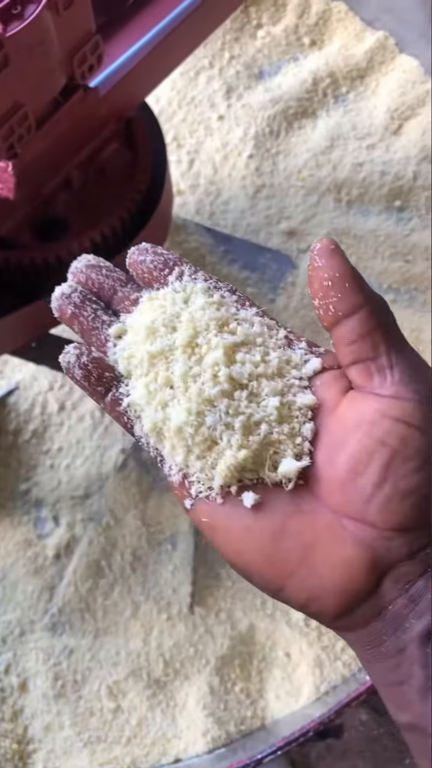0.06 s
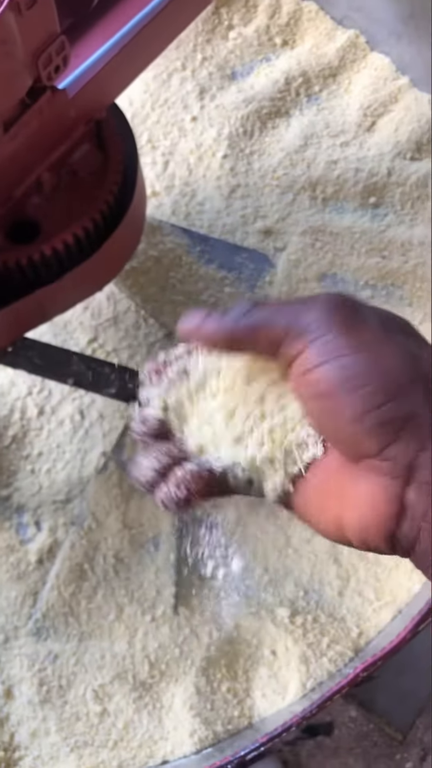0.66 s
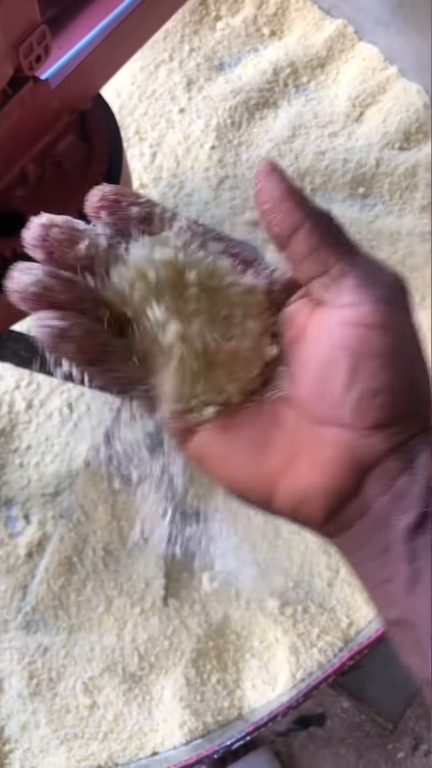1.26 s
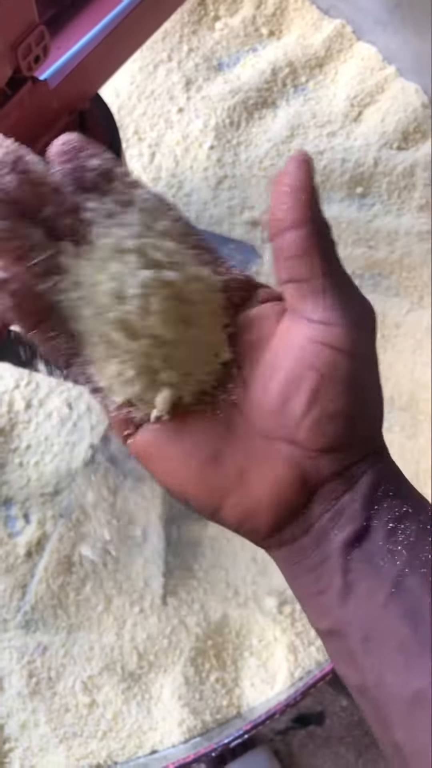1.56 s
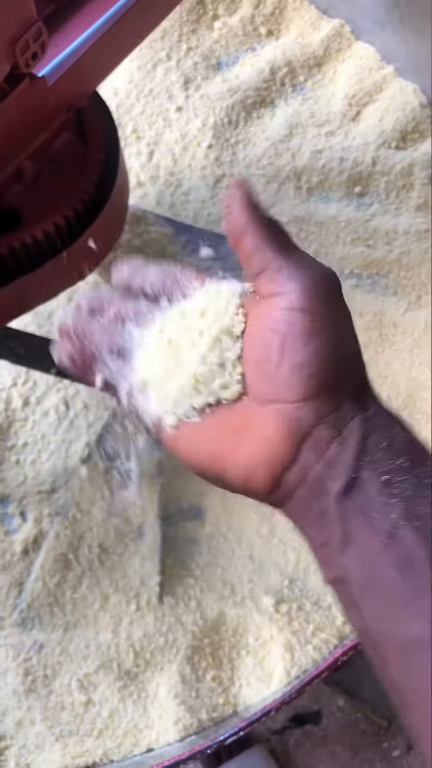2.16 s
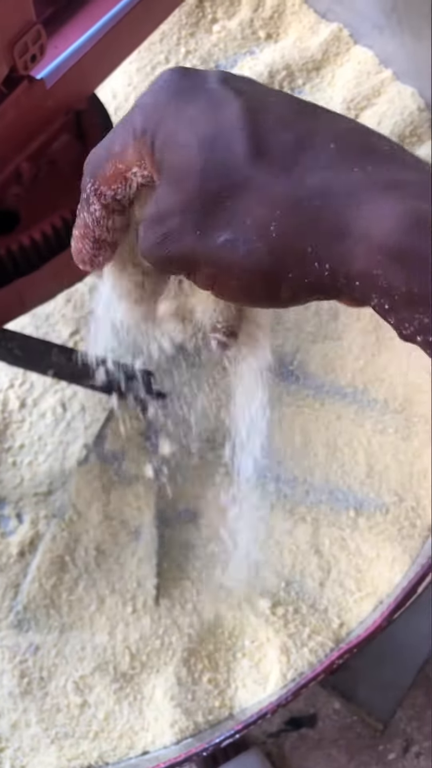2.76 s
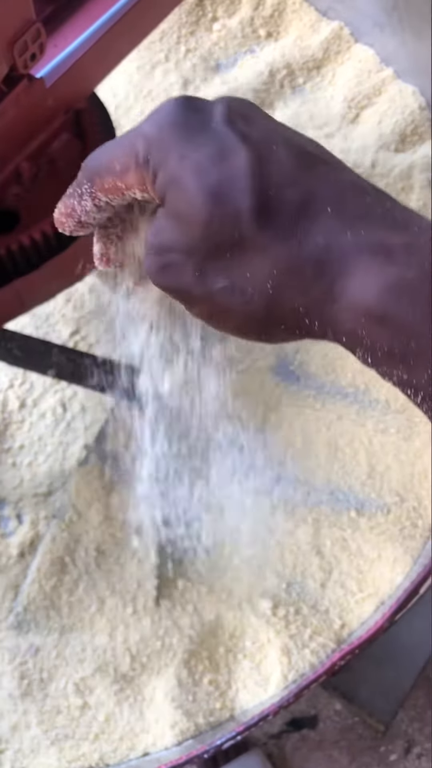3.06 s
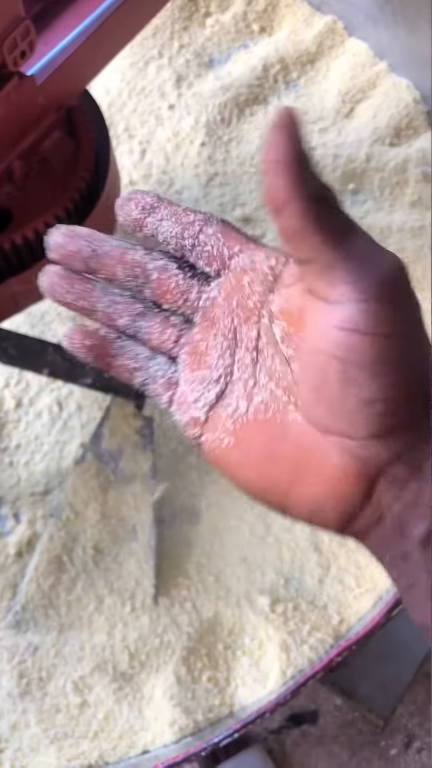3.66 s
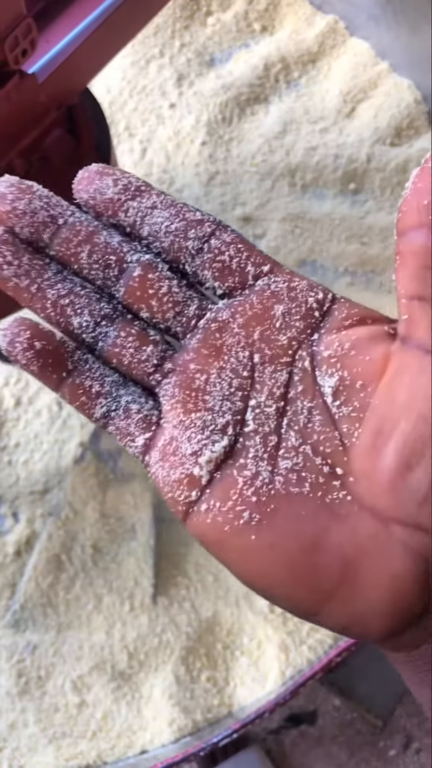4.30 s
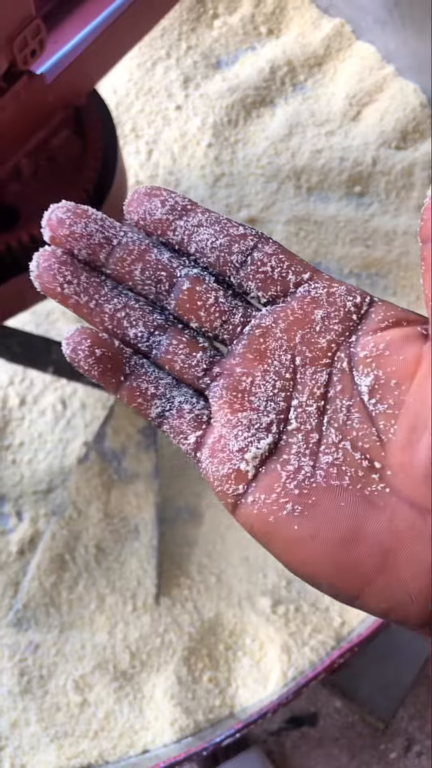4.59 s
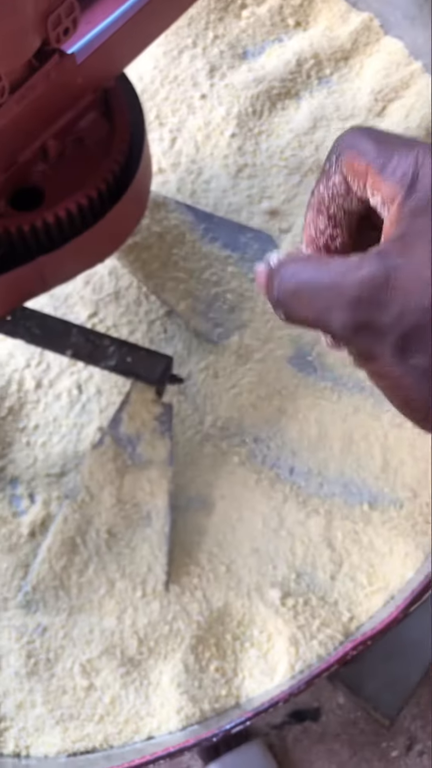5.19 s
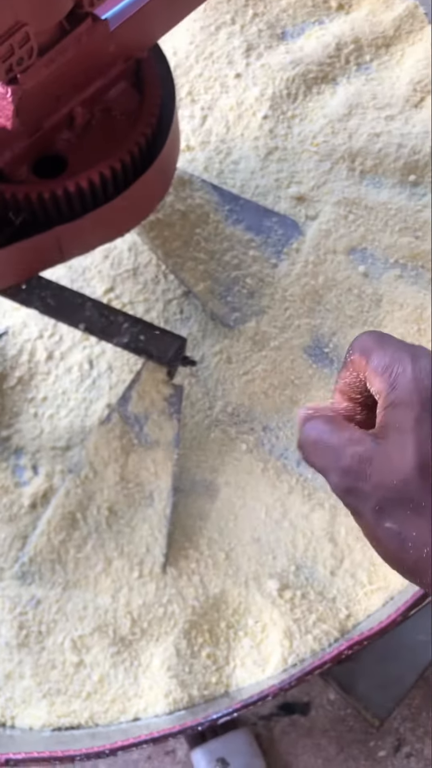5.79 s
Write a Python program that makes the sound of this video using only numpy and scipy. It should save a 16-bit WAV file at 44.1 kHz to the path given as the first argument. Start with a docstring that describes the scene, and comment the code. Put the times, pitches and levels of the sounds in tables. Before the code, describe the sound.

A geared motor hums loudly and steadily with a light rattle, over a softly hissing gas burner and faintly falling grains.

```python
"""Garri frying machine

Close by, a geared motor hums and its gears rattle, nearly alike every shaft turn.
A gas burner hisses under the wide pan, which drones as the paddles push through the meal.
A hand sifts a sample of dry grains back into the pan, with a few faint ticks near the end."""
import sys
import numpy as np
from scipy import signal
from scipy.fft import rfft, irfft, next_fast_len
from scipy.io import wavfile

SR = 44100
rng = np.random.default_rng(int(sys.argv[2]) if len(sys.argv) > 2 else 0)


def unload_audio(sound):
    """Save the sound as a 16-bit wav file, at the path given as the first command line argument."""
    columns = np.transpose(np.atleast_2d(sound))
    # keep every value between -1 and 1, then stretch to whole-number steps
    steps = np.round(np.clip(columns, -1, 1) * 32767)
    wavfile.write(sys.argv[1], SR, steps.astype(np.int16))


N = 257544
TIME = np.arange(N) / SR
HAND_EMPTY_S, EMPTY_FADE_S = 3.35, 1.2  # a fade time is how long a sound takes to fall 60 dB


def gain_of(db):
    """Turns decibels into a factor to multiply by."""
    return 10 ** (np.asarray(db) / 20)


def unit_level(x):
    """Scales a signal to an average level (rms) of 1."""
    return x / np.sqrt(np.mean(x ** 2) + 1e-20)


def coloured(x, points):
    """Shapes white noise of level 1 to a curve with columns pitch_hz, level_db_per_hz."""
    size = next_fast_len(N + 4096)
    hz, db = np.transpose(points)
    level_db = np.interp(np.log(np.fft.rfftfreq(size, 1 / SR) + 1), np.log(hz), db)
    return irfft(rfft(x, size) * gain_of(level_db), size)[:N] * np.sqrt(SR / 2)


def wander(rate_hz, count=16):
    """A smooth random drift of level 1, swinging up to rate_hz times a second."""
    speeds = np.geomspace(rate_hz / 6, rate_hz, count)[:, None]
    drift = np.sin(2 * np.pi * (speeds * TIME[::64] + rng.random((count, 1)))).sum(0)
    return np.interp(TIME, TIME[::64], unit_level(drift))


def noise_band(pitch_hz, width_hz):
    """Noise of level 1 that rings around one pitch."""
    size = next_fast_len(N)
    shape = 1 / (1 + ((np.fft.rfftfreq(size, 1 / SR) - pitch_hz) / width_hz * 2) ** 2)
    return unit_level(irfft(rfft(rng.standard_normal(size)) * shape, size)[:N])


def fade_after(end_s, fade_s):
    """Holds at 1 until end_s, then falls 60 dB every fade_s."""
    return gain_of(-60 * np.maximum(TIME - end_s, 0) / fade_s)


def burner(flicker_db=1.06, waver_db=1.0):
    """A flickering flame and the thin whistles of its gas jet."""
    # roar and hiss of the flame: pitch_hz, level_db_per_hz
    flame_curve = [(25, -95), (55, -77.5), (150, -73.5), (190, -78.5), (320, -80), (520, -80.5),
                   (760, -88.5), (1400, -89), (2400, -92.5), (3100, -99), (4400, -102), (7700, -112.5),
                   (9400, -112.5), (14500, -124.5)]
    # ringing and whistles of the gas jet: pitch_hz, width_hz, level_db
    whistles = [(3450, 500, -72.5), (4370, 620, -74), (6670, 480, -84.5), (8700, 98, -88.5),
                (12740, 130, -94.5)]
    flame = coloured(rng.standard_normal(N) * gain_of(flicker_db * wander(25)), flame_curve)
    jet = sum(gain_of(db + waver_db * wander(3)) * noise_band(hz, width) for hz, width, db in whistles)
    return flame + jet


def ticks():
    """Short, bright, dry snaps."""
    # the snaps: start_s, peak_db, fade_s
    snaps = [(5.354, -57.5, .042), (5.364, -67, .035)]
    brightness = [(1500, -15), (5000, 1), (9500, -8), (11800, -1), (15500, -8)]  # pitch_hz, relative_db
    strength = np.zeros(N)
    for start_s, peak_db, fade_s in snaps:
        rise = np.clip((TIME - start_s) / .001 + 1, 0, 1)
        strength += gain_of(peak_db) * rise * fade_after(start_s, fade_s)
    return strength * unit_level(coloured(rng.standard_normal(N), brightness))


def pour(start_s=0.71, rise_s=0.44, level_db=-77):
    """A soft hiss of grains landing on the meal, from when the fingers open until the hand is empty."""
    stream = np.clip((TIME - start_s) / rise_s, 0, 1) * fade_after(HAND_EMPTY_S, EMPTY_FADE_S)
    return gain_of(level_db) * stream * noise_band(pitch_hz=5700, width_hz=2400)


def grain_flow(trickle_db=-88.5, rise_s=.03, fade_s=.13):
    """How strongly grains fall: a thin trickle between the fingers, plus a spill at each stroke."""
    # the fingers work the grains: start_s, length_s, level_db
    strokes = [(.4, .15, -82.5), (.65, .06, -78.5), (.75, 0.097, -76), (1.29, .52, -76), (2.085, .115, -76),
               (2.28, .12, -80), (5.765, .045, -78)]
    trickle = gain_of(trickle_db) * fade_after(HAND_EMPTY_S, EMPTY_FADE_S)
    power = trickle ** 2  # separate noises add up as squares
    for start_s, length_s, level_db in strokes:
        rise = np.clip((TIME - start_s) / rise_s, 0, 1)
        power += (gain_of(level_db) * rise * fade_after(start_s + length_s, fade_s)) ** 2
    return np.sqrt(power)


def grains(hits_per_s=9000, spread_db=2, clump_db=1):
    """Thousands of tiny dry hits, falling in loose clumps, make a bright fizz."""
    sizes = gain_of(spread_db * np.minimum(rng.exponential(1, N), 4)) * rng.choice([-1, 1], N)
    hits = sizes * (rng.random(N) < hits_per_s / SR) * gain_of(clump_db * wander(35))
    # tone of the fizz: pitch_hz, relative_db
    brightness = [(2000, -27.5), (5000, -6.5), (9700, 1.5), (11400, 10.0),
                  (12700, 0), (13400, -1.5), (15500, -4)]
    return unit_level(coloured(hits, brightness)) * grain_flow()


def pan():
    """The paddles rub the pan so it drones on two low notes; each harder rub is one smooth swell."""
    # the pan's notes under a light rub: pitch_hz, width_hz, level_db
    notes = [(316.6, 35, -68), (506, 50, -63.5)]
    # a paddle presses harder: middle_s, length_s, low_note_rise_db, high_note_rise_db
    rubs = [(.2, 0.96, 10.5, 2), (1.12, 0.46, 8, 8.5), (2.0, 0.58, 10.5, 4), (2.952, .6, 8, 6),
            (5.05, 0.53, 12, 3.5), (5.473, 0.95, 13, 0)]
    drone = np.zeros(N)
    for note, (pitch_hz, width_hz, level_db) in enumerate(notes):
        swell_db = np.zeros(N)
        for middle_s, length_s, *rise_db in rubs:
            swell = np.cos(np.pi * np.clip((TIME - middle_s) / length_s, -.5, .5)) ** 2
            swell_db += rise_db[note] * swell
        drone += gain_of(level_db + swell_db) * noise_band(pitch_hz, width_hz)
    return drone


def chafing(turns, squeak_every_s=.77, first_squeak_s=.06, squeak_db=-86, scuff_db=-74):
    """A slow gear squeaks thinly each time it goes round; the fast shaft scuffs once a turn."""
    swell = np.cos(np.pi * (TIME - first_squeak_s) / squeak_every_s) ** 2
    squeak = gain_of(squeak_db) * swell * noise_band(pitch_hz=9820, width_hz=170)
    contact = np.exp(-(turns % 1) / 0.11)
    scuff = gain_of(scuff_db) * contact * noise_band(pitch_hz=6900, width_hz=700)
    return squeak + scuff


def rattle(turns, fade_s=.12, uneven_db=2, force_spread=0.12, teeth=48):
    """Each tooth knocks with its own force at its own place in the turn, and the housing rings."""
    place_in_turn = (np.arange(teeth) + rng.random(teeth)) / teeth
    tooth_force = gain_of(uneven_db * rng.standard_normal(teeth)) * rng.choice([-1, 1], teeth)
    # the machine is already running, so knocks from a short lead-in still ring
    lead = SR // 4
    all_turns = np.concatenate([np.arange(-lead, 0) * (turns[1] - turns[0]), turns])
    laps = np.arange(-3, int(turns[-1]) + 2)[:, None]
    knock_at = np.interp(laps + place_in_turn, all_turns, np.arange(N + lead)).ravel()
    forces = (tooth_force * (1 + force_spread * rng.standard_normal((len(laps), teeth)))).ravel()
    in_range = (knock_at > 0) & (knock_at < N + lead - 1)
    knocks = np.bincount(np.round(knock_at).astype(int), forces * in_range, N + lead)
    ring_spectrum = rfft(gain_of(-60 * TIME[:lead] / fade_s) * rng.standard_normal(lead))
    ring = irfft(ring_spectrum / abs(ring_spectrum))  # no single pitch stands out
    return unit_level(signal.oaconvolve(knocks, ring)[lead:lead + N])


def gears(turns, patterns=7):
    """As the paddle arm goes round, other teeth meet and one rattle melts into the next."""
    # ring of the gear housing: pitch_hz, level_db_per_hz
    housing_curve = [(170, -110), (250, -84.5), (500, -88), (760, -86.5), (950, -84), (1480, -83.5),
                     (1720, -88.5), (2250, -89), (2650, -91), (3000, -101), (4400, -104), (6600, -114),
                     (9000, -126), (15000, -150)]
    position = TIME / TIME[-1] * (patterns - 1)
    shares = [np.cos(np.pi / 2 * np.clip(position - k, -1, 1)) for k in range(patterns)]
    return coloured(sum(share * rattle(turns) for share in shares), housing_curve)


def motor_hum(turns, strong_waver_db=-0.01, weak_waver_db=1):
    """Clean tones locked to the shaft: two strong ones hold firm, the weak ones waver."""
    # tones of the motor and gears: cycles_per_turn, level_db
    tones = [(4, -68.5), (8, -30), (9, -54.5), (10, -55), (11, -61), (12, -33.5), (14, -59), (15, -58),
             (16, -53.5), (20, -60.5), (28, -65.5), (32, -71.5), (40, -64.5), (44, -66.5), (47, -73.5),
             (48, -63), (52, -61), (56, -66), (57, -64.5), (70, -68.5), (103, -72.5), (106, -68.5),
             (114, -74), (122, -76.5), (133, -71.5), (145, -68.5), (165, -69), (223, -74.5)]
    hum = np.zeros(N)
    for cycles_per_turn, level_db in tones:
        strong = cycles_per_turn in (8, 12)
        waver_db, phase = (strong_waver_db, 1 / 2) if strong else (weak_waver_db, rng.random())
        waver = unit_level(gain_of(waver_db * wander(1.965)))
        tone = np.sqrt(2) * np.sin(2 * np.pi * (cycles_per_turn * turns + phase))
        hum += gain_of(level_db) * waver * tone
    return hum


def scene(turns_per_minute=648.13):
    """One shaft drives the hum, gears and chafing; burner, pan, grains and ticks join them."""
    turns = turns_per_minute / 60 * TIME + 0.00036 * wander(6)  # the load nudges the shaft
    drive = motor_hum(turns) + gears(turns) + chafing(turns)
    return (drive + burner() + pan() + grains() + pour() + ticks())[None]


def record(dry, cutoff_hz=15700):
    """Cuts away the very highest treble."""
    low_pass = signal.firwin(511, cutoff_hz, window=("kaiser", 9), fs=SR)
    return signal.oaconvolve(dry, low_pass[None], "same")


dry = scene()
out = record(dry)
unload_audio(out)
```